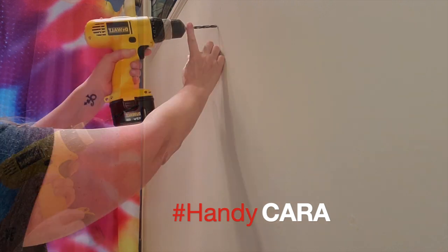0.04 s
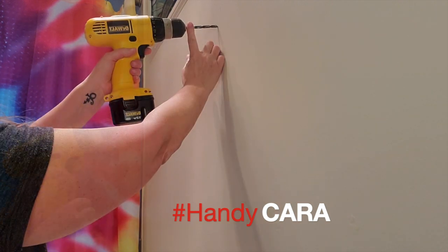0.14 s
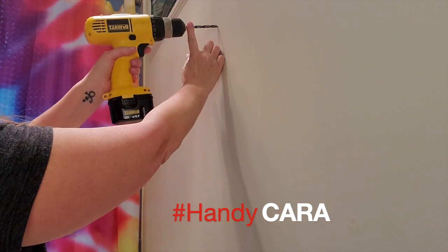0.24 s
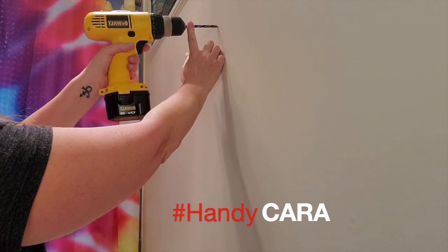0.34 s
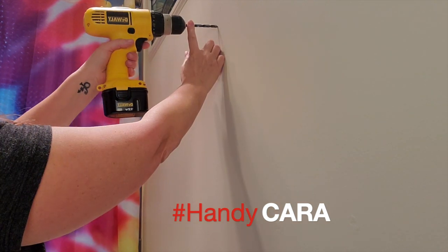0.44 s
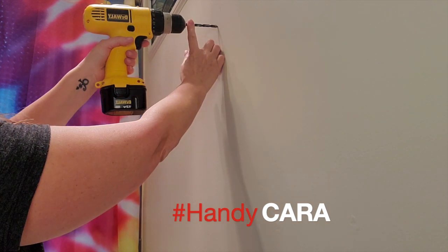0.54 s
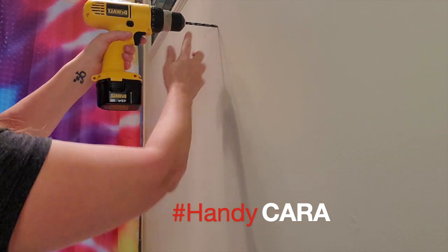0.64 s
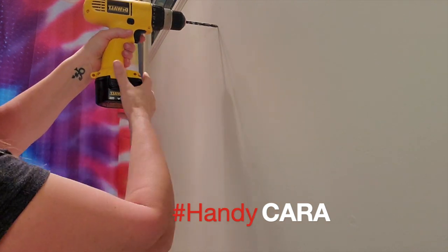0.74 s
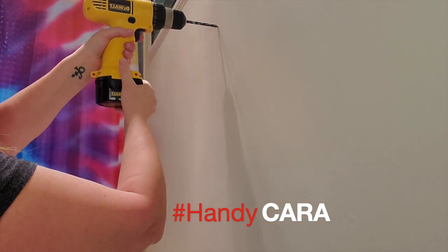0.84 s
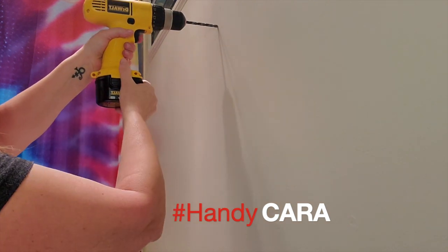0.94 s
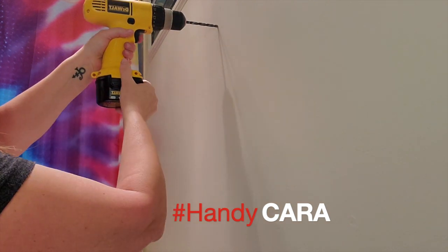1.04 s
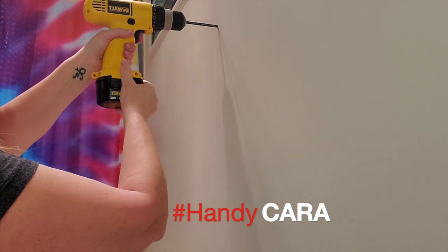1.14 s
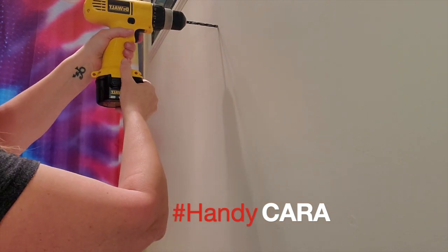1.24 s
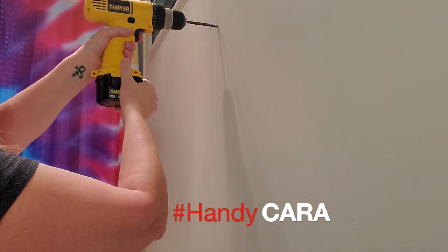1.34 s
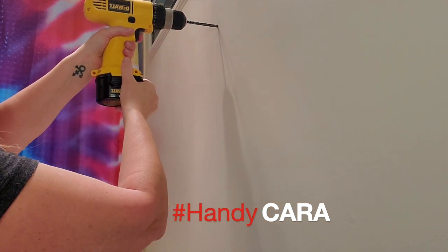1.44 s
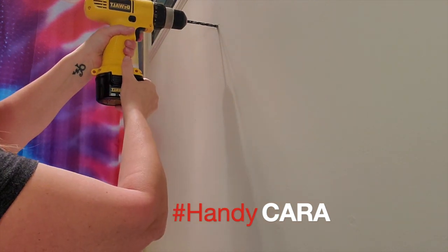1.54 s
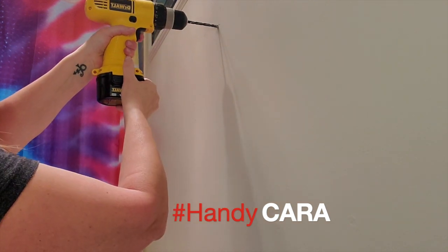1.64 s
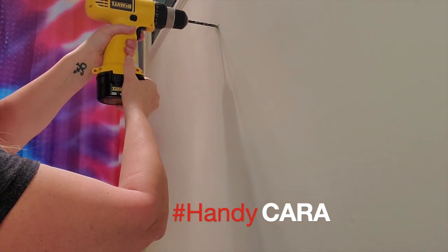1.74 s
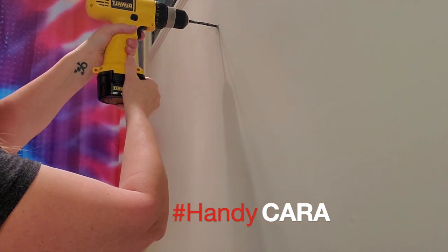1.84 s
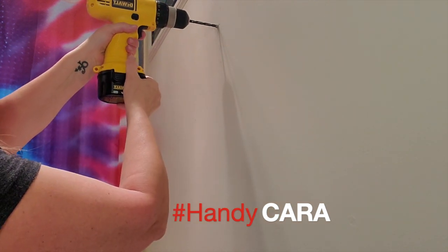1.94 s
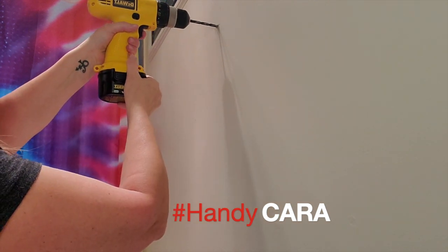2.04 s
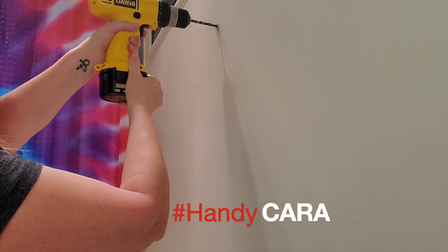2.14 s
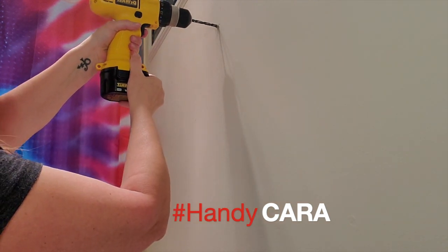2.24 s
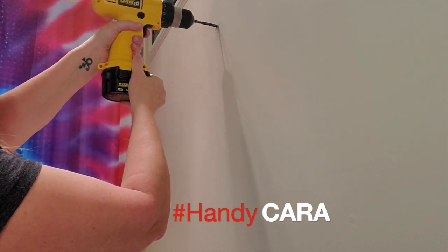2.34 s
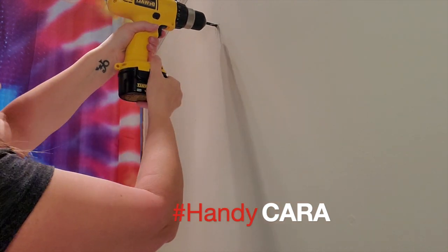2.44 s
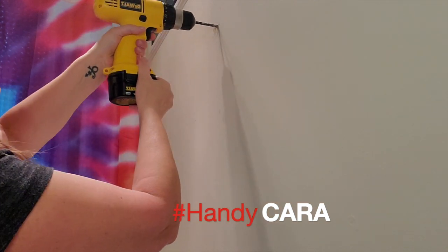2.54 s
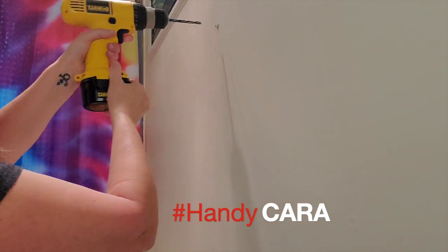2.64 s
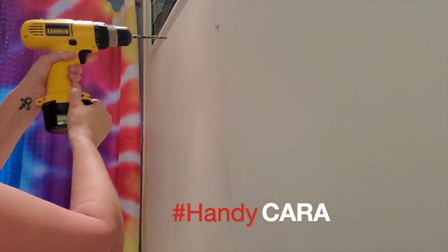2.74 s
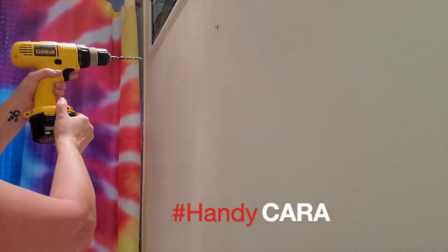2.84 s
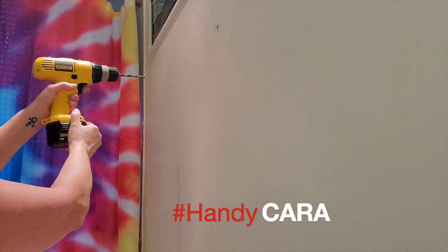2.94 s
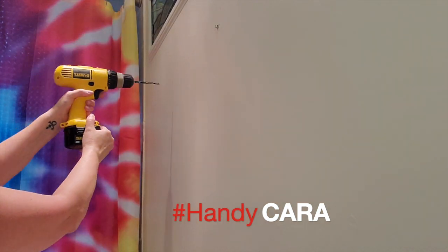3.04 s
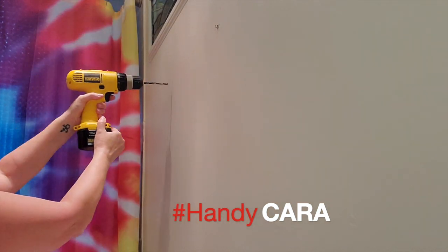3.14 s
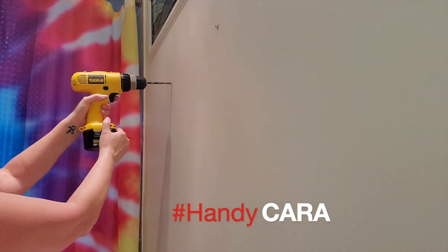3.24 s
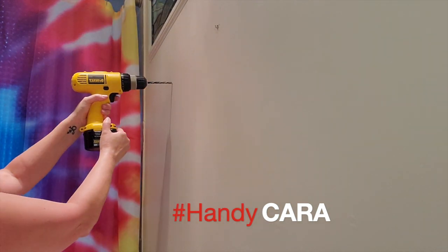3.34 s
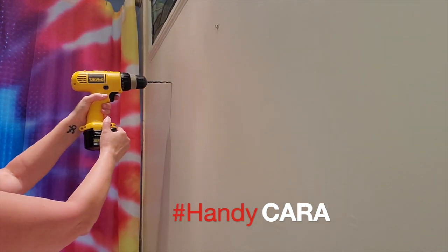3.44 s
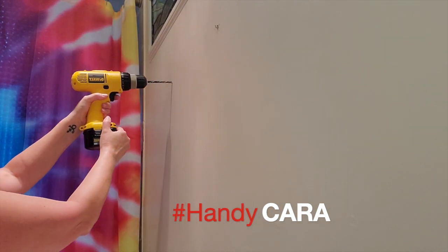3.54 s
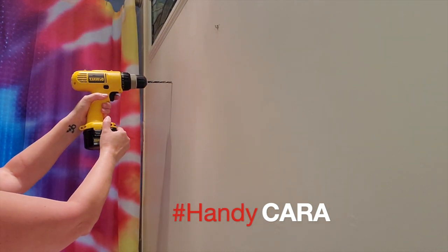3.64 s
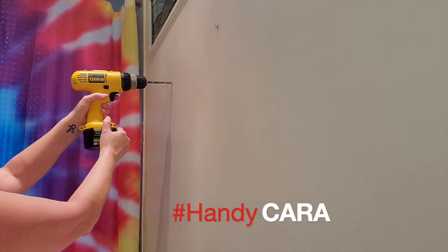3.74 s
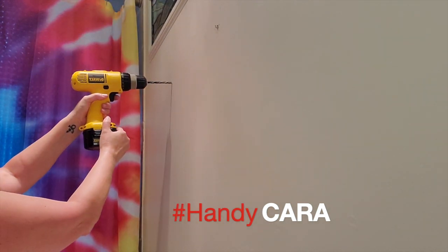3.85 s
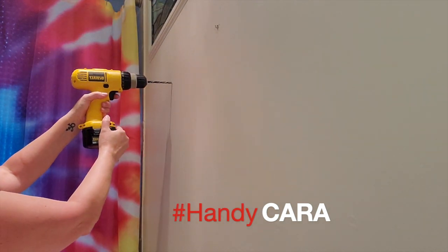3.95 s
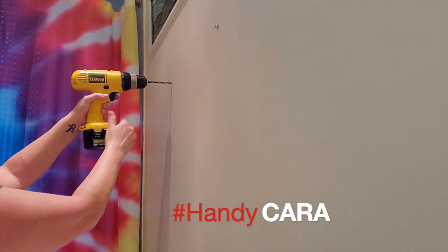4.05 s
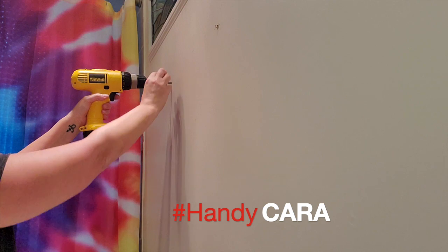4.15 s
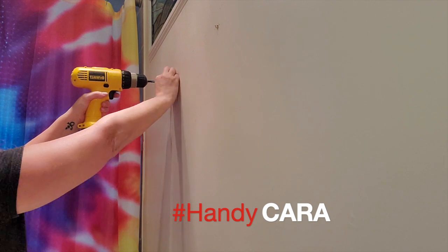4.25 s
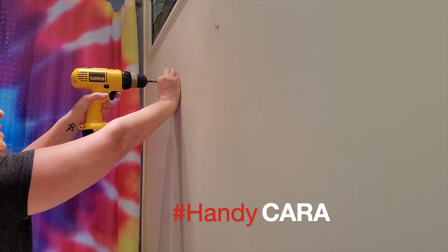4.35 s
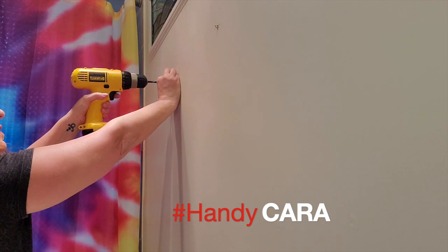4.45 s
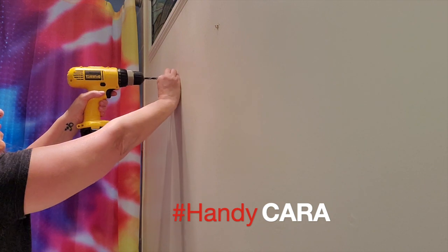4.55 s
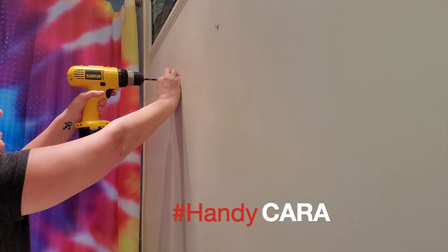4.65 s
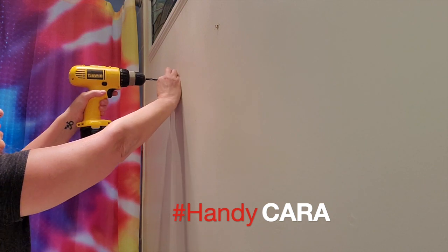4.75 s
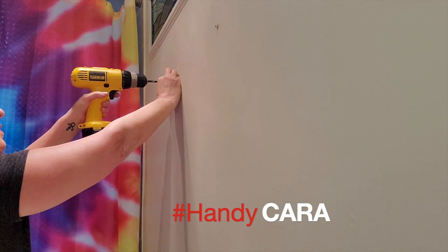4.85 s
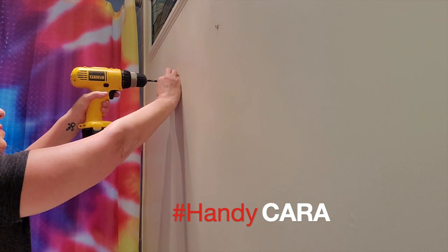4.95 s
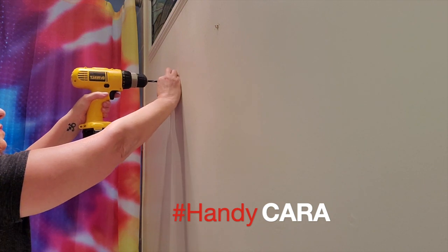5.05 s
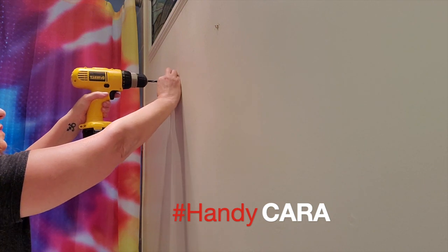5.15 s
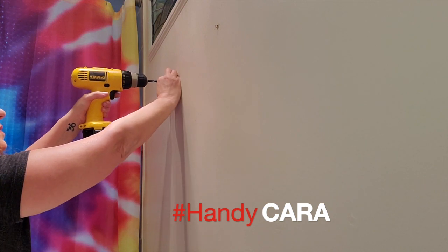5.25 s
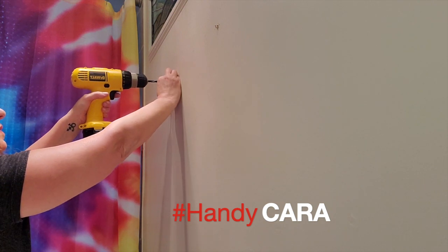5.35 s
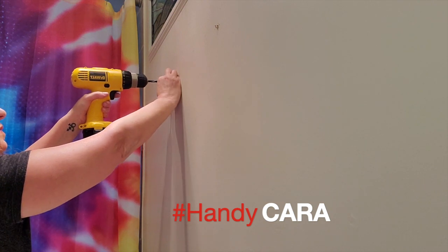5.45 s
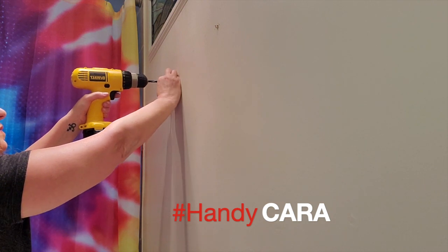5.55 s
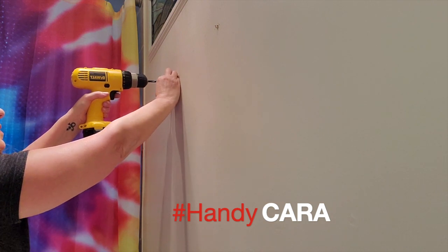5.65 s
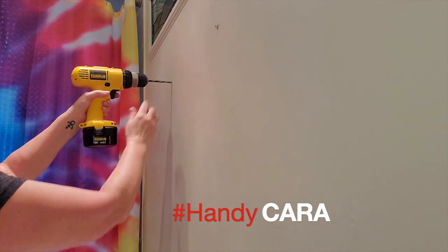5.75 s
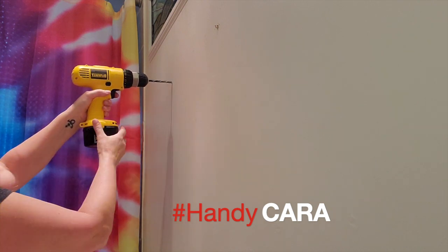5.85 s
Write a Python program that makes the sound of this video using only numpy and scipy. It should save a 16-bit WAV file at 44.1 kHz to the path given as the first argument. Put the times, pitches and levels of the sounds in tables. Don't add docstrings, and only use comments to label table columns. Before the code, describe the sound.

A cordless drill whirs up, bores into a hollow wall, races at breakthrough and stops dead, followed by scattered knocks, clinks and brushing.

```python
import sys
import numpy as np
from scipy import signal
from scipy.fft import rfft, irfft
from scipy.io import wavfile
from scipy.ndimage import uniform_filter1d

SR = 44100
rng = np.random.default_rng(int(sys.argv[2]) if len(sys.argv) > 2 else 0)


def file_out(sig):
    cols = np.atleast_2d(sig).T
    lim = np.clip(cols, -1, 1)
    pcm = np.round(lim * 32767).astype(np.int16)
    wavfile.write(sys.argv[1], SR, pcm)


def field_ratio(decibels):
    return 10 ** (np.asarray(decibels, dtype=float) / 20)


N = 260537
TIME_S = np.arange(N) / SR

# t/s, goal speed/(turns/s), time constant/s
SPEED_STAGES = [
    (.867, 297.5, .184),
    (1.122, 366.5, .09),
    (1.63, 371, .07),
    (2.041, 420.3, .135),
    (2.391, 497, .013),
    (2.428, 66, .586),
    (2.545, 419, .01),
]
START_S, THROUGH_S, BRAKE_S = .84, 2.407, 2.554
IDLE_TURNS_PER_S, CRUISE_TURNS_PER_S = 184, 370
# t/s, half length/s, hiss level/dB, load level/dB, boom level/dB
SHOVES = [(0.94, 0.092, 2, -4, 13), (1.14, 0.038, -2.5, 0, 8.5), (1.19, 0.006, -6, -22, 13),
          (1.239, 0.0047, 3.5, 3, -18), (1.283, 0.015, 0, 1.5, 1), (1.353, 0.022, 0, -3, 17.5),
          (1.405, 0.042, -2, 5.5, 9.5), (1.528, 0.11, 1.5, 0.5, 10), (1.562, 0.024, 0, 9, -5),
          (1.624, 0.076, -0.5, -2, 3), (1.808, 0.11, -0.5, 0, 4), (1.921, 0.021, -2, -2.5, 7.5),
          (2.188, 0.056, 1, 0, -30), (2.288, 0.042, 1, -4, -11.5), (2.354, 0.1, 1, 3.5, 23),
          (2.525, 0.064, 1, 3.5, 16.5)]
HISS_DB, HISS_PER_DECADE_DB, HISS_TOP_DB, HISS_DIES_DB_PER_S = -39.5, 22.5, -39, 984
LOAD_DB, LOAD_PER_DECADE_DB, LOAD_DIES_DB_PER_S = -43, 29, 601
BITE_DB_PER_S, FREE_DB = 5.5, -6.5
BOOM_DB, BOOM_PER_DECADE_DB, BOOM_DIES_DB_PER_S, BOOM_WAVER_DB = -52.5, 25, 500, 5.5
# f/Hz, level/(dB per Hz)
GEAR_HISS = [(820, -58.5), (1400, -37), (1990, -26.5), (2160, -18), (2510, -0.5), (2720, -8.5), (3330, -7),
             (4540, -8), (5300, -12.5), (6080, -13.5), (7200, -10), (9470, -8.5), (12100, -11.5),
             (14300, -10.5), (15500, -16)]
# f/Hz, width/Hz, level over hiss/dB
CASING_MODES = [(2540, 40, -25), (14200, 1600, -18)]
# multiple of motor speed, level over hiss/dB, width/Hz
GEAR_ORDERS = [(2, -28, 8), (3.28, -25, 15), (7, -19, 4), (10, -31, 12), (12, -14, 10), (12.55, -12, 14),
               (24, -11, 50), (25.05, -11, 16), (36.55, -17, 25), (38, -18, 25), (39.1, -18, 25)]
# f/Hz, level/dB
CASING_RADIATION = [(2000, -4), (2400, 9), (2555, 12), (2610, 9.5), (2660, 5), (2750, 8), (3000, 9),
                    (3300, 8), (3500, 12), (3900, 14), (4300, 5), (4450, 4), (4620, 1), (4950, 7),
                    (5180, 3), (5400, 5), (6000, 7), (7000, 5), (8200, 7), (8800, -4), (9150, 5), (9400, 1),
                    (9800, 6), (12000, 7), (13000, 4)]
# f/Hz, level over hiss/dB
SHAFT_HUM = [(180, -36), (205, -14), (225, -5), (250, -5), (280, -8), (350, -14), (375, -16), (392, -8),
             (408, -3), (490, -28)]
# f/Hz, level over hiss/dB
ARMATURE_WHINE = [(1000, -36), (1160, -26), (1230, -10), (1350, -11), (1620, -2), (1700, -3), (1800, -15),
                  (1860, -18), (2030, -12), (2100, -12), (2450, -9)]
# f/Hz, level/(dB per Hz)
GRIND_SPECTRUM = [(150, -23.5), (250, -2.5), (376, 1.5), (480, -11), (674, 7.5), (883, -2), (1190, 2),
                  (1380, 0.5), (2000, -10), (2600, -55), (4400, -120)]
# f/Hz, width/Hz, level over load/dB
PANEL_MODES = [(404.4, 9.9, -24), (688, 9, -10), (622, 220, -34), (1000, 150, -20), (1200, 99, -17.5)]
# t/s, f/Hz, level/dB
BIT_CHATTER = [(1.08, 195, -13), (1.3, 266, -8), (1.45, 289, -4), (1.62, 296, -6), (1.73, 318, 0),
               (2.05, 322, 1.5), (2.2, 344, 0), (2.28, 348, -12), (2.4, 350, -30)]
# multiple of chatter, level over load/dB, width/Hz
FLUTE_ORDERS = [(1, -8, 5), (2, -3, 6), (3, -11, 8)]

# start t/s, end t/s, start f/Hz, end f/Hz, level/dB
SWITCH_STEPS = [(0.774, 0.802, 13370, 13050, -65), (0.805, 0.845, 10930, 10800, -65.5),
                (0.832, 0.889, 9100, 10060, -51.5), (0.882, 0.979, 10200, 10500, -56),
                (0.96, 1.25, 10380, 11630, -62.5), (5.843, 5.872, 12200, 13000, -69),
                (5.864, 5.874, 12100, 11800, -60), (5.886, 5.896, 10900, 9900, -62),
                (5.894, 5.916, 8800, 9590, -54), (5.883, 5.917, 4270, 4480, -71)]
# t/s, peak level/dB, bass level/dB, upper level/dB
KNOCKS = [(0.068, -53.5, 14.5, -1), (0.777, -62.5, -5, 1.5), (2.779, -64, 4, 1.5), (2.904, -64, 11.5, -25),
          (3.247, -40.5, -6, -5.5), (3.341, -47, -19.5, -6.5), (3.507, -42, -2, -6), (3.725, -56, -41, -20),
          (4.054, -57, -8, -11), (4.195, -54, -20, -2), (4.358, -53, 3, -9.5), (4.412, -61, -22, -4),
          (4.481, -61, -6, -12), (4.632, -53, -15, -3), (4.83, -37, -11.5, -4), (4.991, -45.5, -3, -11),
          (5.633, -57, -13, -7)]
# f/Hz, level/dB, t60/s
WALL_MODES = [(139, -1, 0.19), (183.3, -7, 0.23), (214, 17.5, 0.061), (322.4, -0.5, 0.19), (405.8, 1, 0.22),
              (578.6, 7.5, 0.097), (625, 13.5, 0.073), (802, 1, 0.071), (950, 5, 0.052),
              (1042, 26.5, 0.014), (1194, 10, 0.027), (1570, -1, 0.041)]
# f/Hz, level/(dB per Hz)
THUD_SPECTRUM = [(60, -17), (200, 7), (600, -4), (1200, -22), (2200, -37), (4000, -50), (12000, -90)]
# t/s, peak level/dB, f/Hz, t60/s
CLINKS = [(2.663, -62, 717, 0.065), (2.777, -56, 660, 0.054), (2.829, -57, 549, 0.086),
          (2.979, -45, 3850, 0.035), (4.003, -70, 1870, .03), (4.02, -55, 3730, 0.04),
          (4.112, -58.5, 3380, .04), (4.135, -64, 3330, .06), (4.153, -66, 3340, .05),
          (4.182, -65, 3370, .04), (4.189, -54.5, 1014, 0.062), (4.22, -65, 2620, .04),
          (4.295, -61, 974, 0.048), (4.302, -58, 410, 0.071), (4.31, -66, 1350, 0.035),
          (4.358, -62, 1640, .03), (4.417, -65, 590, 0.067), (4.441, -62, 1050, 0.079),
          (4.481, -58.5, 1690, 0.057), (4.517, -60, 1054, 0.054), (4.524, -55, 464, 0.058),
          (5.845, -66, 2180, 0.022)]
CLINK_PARTIALS = [(.84, .35), (.93, .55), (.975, .6), (1, .7), (1.045, .55), (1.13, .45), (1.24, .3)]
# t/s, peak level/dB, f/Hz, t60/s
TICKS = [(0.5916, -72, 3950, 0.033), (0.7072, -56.5, 6170, 0.015), (0.7701, -54, 3760, 0.014),
         (0.776, -66, 3530, 0.021), (2.9784, -54.5, 3900, 0.033), (3.2405, -64, 2200, 0.027),
         (4.001, -58.5, 4700, 0.017), (4.0202, -60.5, 5730, 0.022), (4.1788, -69, 3470, 0.032),
         (4.2997, -69.5, 4070, 0.019), (4.353, -71, 3240, 0.025), (4.4805, -75, 3800, 0.028),
         (4.5194, -83, 2530, 0.03), (4.6264, -66, 2830, 0.02), (5.5993, -70, 2240, 0.029),
         (5.623, -69, 2240, 0.024), (5.631, -62, 2160, 0.023), (5.8446, -73, 2180, 0.021)]
# peak t/s, peak level/dB, rise/s, fall/s
SKIN_STROKES = [(.772, -49, 0.0098, 0.0097), (.86, -51, 0.038, .008), (2.62, -77, .01, .035),
                (2.68, -71.5, 0.033, 0.38), (2.972, -64, 0.062, 0.038), (4.008, -72, 0.041, 0.037),
                (4.05, -79, .05, 0.18), (4.116, -77, 0.049, 0.3), (4.482, -86, 0.025, 0.044),
                (4.624, -79, .035, .05), (5.638, -93, .045, .017), (5.843, -64, .002, 0.011),
                (5.91, -54, 0.031, .01)]
# f/Hz, level/(dB per Hz)
SKIN_SPECTRUM = [(700, -15), (1200, -3), (2500, -3.5), (3600, 2), (6000, -3), (10000, -9), (15500, -23)]
# peak t/s, peak level/dB, rise/s, fall/s
DUST_SLIDES = [
    (3.056, -53, 0.063, 0.38),
    (4.006, -55, 0.0067, 0.032),
    (4.18, -70.5, .05, .25),
]
# f/Hz, level/(dB per Hz)
DUST_SPECTRUM = [(530, -22), (900, -27), (1100, -28), (1200, -20), (2220, -12.5), (2620, -17), (3970, -6.5),
                 (4270, -9), (15400, -7)]
# peak t/s, peak level/dB, rise/s, fall/s
RUSTLES = [(.626, -71, 0.35, 0.035), (.776, -61.5, 0.15, 0.094), (.858, -61, 0.048, .004),
           (2.6, -64.5, 0.0065, 0.19), (2.782, -65.5, 0.0079, 0.25), (2.91, -76.5, .03, 0.66),
           (3.08, -76, .03, 0.31), (4.0, -64.5, 0.0034, 0.23), (4.2, -79, 0.057, 0.36),
           (4.37, -78, 0.34, 0.12), (4.53, -68.5, 0.13, 0.02), (4.638, -59, .02, .04),
           (5.638, -50, 0.031, 0.029), (5.91, -61.5, 0.28, .01)]
# f/Hz, level/(dB per Hz)
RUSTLE_SPECTRUM = [(150, -0.5), (250, 1), (400, 4), (600, -9.5), (1000, -1.5), (1700, -11), (2500, -19.5)]

# f/Hz, t60/s
ROOM_T60 = [(150, 0.138), (600, 0.12), (3000, 0.1), (12000, 0.055)]
# f/Hz, likeness
NEAR_LIKENESS = [(100, 0.98), (300, 1), (600, 0.89), (1200, 0.87), (2500, 0.63), (5000, 0.17),
                 (12000, 0.081)]
# f/Hz, left over right level/dB
PORT_LEAN = [(60, -6.5), (130, 0), (290, -3), (640, 1), (1410, 0), (3100, 1.5), (6820, -0.5), (15000, 6.5)]
# t/s, half length/s, deep level/dB, low level/dB
JOLTS = [(0.098, 0.021, -55, -81), (0.416, 0.08, -66, -80), (0.592, 0.025, -76, -56),
         (0.797, 0.11, -59, -80), (1.395, 0.037, -77, -55), (1.663, 0.11, -72, -57.5),
         (2.2, 0.043, -67, -80), (2.378, 0.068, -41, -50), (2.575, 0.061, -42.5, -48),
         (2.68, 0.068, -65, -83), (2.948, 0.076, -57, -78), (3.13, 0.15, -60.5, -80),
         (3.275, 0.027, -73, -45), (3.4, 0.12, -64, -58), (3.54, 0.048, -50, -51),
         (4.082, 0.12, -56.5, -66), (4.384, 0.056, -62, -57), (4.487, 0.06, -69, -61),
         (4.7, 0.065, -91, -55.5), (4.87, 0.047, -55, -42.5), (5.014, 0.047, -65, -49)]
DEEP_DB, LOW_DB, LUMPY_DB, SETTLE_S, SETTLED_DB = -73, -61.5, 0.5, 5.08, -2.5
# f/Hz, level/(dB per Hz)
FLOOR_SPECTRUM = [(88, -32), (150, -5.5), (172, -20.5), (245, -11), (270, -14.5), (537, -24.5),
                  (641, -20.5), (827, -23.5), (913, -20.5), (1230, -25.5), (3540, -26.5), (10400, -38.5),
                  (16400, -47)]
# f/Hz, likeness
FLOOR_LIKENESS = [(60, -0.097), (180, 0.22), (550, 0.41), (1650, -0.019), (4970, -0.59), (15000, -0.36)]
FLOOR_DB = -69.5


def drill():
    t = np.arange(START_S, BRAKE_S + .065, 1 / SR)
    speed = motor_speed(t)
    hiss_db, load_db, boom_db = effort(t, speed)
    wander = 0.0014 + .007 * (t > THROUGH_S)
    speed = uniform_filter1d(speed, 600) * (1 + wander * drift(len(t), 60))
    tool = field_ratio(hiss_db + 2.5) * gears(t, speed)
    tool += field_ratio(load_db - 2.5) * grinding(t)
    tool += field_ratio(boom_db) * panel_boom(t)
    out = np.zeros(N)
    add(out, t[0], tool * signal.windows.tukey(len(t), .015))
    return out


def motor_speed(t):
    speed = np.full(len(t), float(IDLE_TURNS_PER_S))
    for s, goal, lag_s in SPEED_STAGES:
        excess = np.interp(s, t, speed) - goal
        closing = goal + excess * np.exp(-np.maximum(t - s, 0) / lag_s)
        speed = np.where(t < s, speed, closing)
    return speed


def effort(t, speed):
    pace = np.log10(speed / CRUISE_TURNS_PER_S)
    slow = np.minimum(pace, 0)
    braked_s = np.maximum(t - BRAKE_S, 0)
    hiss_db, load_db, boom_db = sum(np.outer(db, hump(t, s, half_s)) for s, half_s, *db in SHOVES)
    hiss_db = hiss_db + np.minimum(HISS_DB + HISS_PER_DECADE_DB * pace, HISS_TOP_DB)
    hiss_db = hiss_db - HISS_DIES_DB_PER_S * braked_s
    free = .5 + .5 * np.tanh((t - THROUGH_S) / 0.019)
    load_db = load_db + LOAD_DB + LOAD_PER_DECADE_DB * slow
    load_db = load_db + BITE_DB_PER_S * (t - 1.7) + FREE_DB * free
    load_db = load_db - LOAD_DIES_DB_PER_S * np.maximum(braked_s - .022, 0)
    boom_db = boom_db + BOOM_DB + BOOM_PER_DECADE_DB * slow + BOOM_WAVER_DB * drift(len(t), 23)
    boom_db = boom_db - BOOM_DIES_DB_PER_S * np.maximum(braked_s - .03, 0)
    return hiss_db, load_db, boom_db


def gears(t, speed):
    turns = np.cumsum(speed) / SR
    throb = 1 + 0.13 * np.cos(2 * np.pi * .57 * turns)
    air = rng.standard_normal(len(t)) * throb * field_ratio(.9 * drift(len(t), 25))
    out = streaked(coloured(air, GEAR_HISS[:-1]), speed)
    for hz, width_hz, db in CASING_MODES:
        out += field_ratio(db + drift(len(t), 7)) * evened(resonate(air, hz, width_hz))
    pace_db = np.minimum(1.6 * np.log10(speed / 380), 0)
    for k, db, width_hz in GEAR_ORDERS:
        hz = k * speed
        level_db = db + read(CASING_RADIATION, hz) + k * k / 12 * pace_db
        if k == 7:
            level_db = level_db - np.clip(hz / 15 - 175, 0, 9)
        out += field_ratio(level_db) * order(hz, width_hz, steady=.75, waver_db=1.5)
    hum_db = read(SHAFT_HUM, speed) - 9 * (t > THROUGH_S)
    out += field_ratio(hum_db) * order(speed, 6, steady=.88, waver_db=1.4)
    whine_hz = 5 * speed
    out += field_ratio(read(ARMATURE_WHINE, whine_hz)) * order(whine_hz, 7, steady=.88, waver_db=1.4)
    return out


def streaked(x, speed, streak_db=3.0, valley_db=-12):
    hz, t, z = signal.stft(x, SR, nperseg=1024)
    streaks = uniform_filter1d(rng.standard_normal(z.shape), size=8, axis=1)
    streaks = evened(uniform_filter1d(streaks, 2, 0))
    slow = 1 - np.interp(t, np.arange(len(x)) / SR, speed) / 420
    valley = np.exp(-(np.log(hz / 6500 + 1e-9) / 1.2) ** 2)[:, None] * slow * valley_db
    return evened(signal.istft(z * field_ratio(streak_db * streaks + valley), SR, nperseg=1024)[1][:len(x)])


def grinding(t):
    grit = rng.standard_normal(len(t)) * field_ratio(0.44 * drift(len(t), 25))
    out = evened(coloured(grit, GRIND_SPECTRUM))
    for hz, width_hz, db in PANEL_MODES:
        out += field_ratio(db) * evened(resonate(grit, hz, width_hz))
    at_s, hz, db = np.transpose(BIT_CHATTER)
    chatter_hz, chatter_db = np.interp(t, at_s, hz), np.interp(t, at_s, db)
    for k, db, width_hz in FLUTE_ORDERS:
        out += field_ratio(db + chatter_db) * order(k * chatter_hz, width_hz, steady=0.8)
    return out


def panel_boom(t):
    thrust = rng.standard_normal(len(t))
    upper = 0.054 + .5 * (t > THROUGH_S)
    return evened(resonate(thrust, 210, 38.7)) + upper * evened(resonate(thrust, 476, 344))


def switch():
    out = np.zeros(N)
    for start_s, end_s, from_hz, to_hz, db in SWITCH_STEPS:
        hz = np.linspace(from_hz, to_hz, int((end_s - start_s) * SR))
        fuzz = evened(resonate(rng.standard_normal(len(hz)), hz, 240))
        tone = np.sqrt(2) * np.sin(2 * np.pi * np.cumsum(hz) / SR) + 2.34 * fuzz
        add(out, start_s, field_ratio(db) * tone * signal.windows.tukey(len(hz), .3))
    return out


def knocks():
    out, t = np.zeros(N), TIME_S[:SR // 3]
    swell = 1 - np.exp(-(t / .0105) ** 2)
    for s, peak_db, bass_db, upper_db in KNOCKS:
        tilt = [(200, bass_db), (400, 0.019), (600, upper_db)]
        ring = np.zeros(len(t))
        for hz, mode_db, t60_s in WALL_MODES:
            detune, phase = 1 + 0.027 * rng.standard_normal(), 2 * np.pi * rng.random()
            spot_db = 1.8 * rng.standard_normal()
            level_db = mode_db + spot_db + read(tilt, hz) - 60 * t / t60_s
            ring += field_ratio(level_db) * np.sin(2 * np.pi * hz * detune * t + phase)
        thud = coloured(coloured(rng.standard_normal(len(t)), THUD_SPECTRUM), tilt)
        thud = evened(thud) * field_ratio(7.0 - 60 * t / 0.096)
        add(out, s - .005, field_ratio(peak_db) * (ring + thud) * swell)
    return out


def clinks():
    out, t = np.zeros(N), TIME_S[:4000]
    for s, db, hz, t60_s in CLINKS:
        ring = sum(g * np.sin(2 * np.pi * k * hz * t + 40 * k) for k, g in CLINK_PARTIALS)
        decay = field_ratio(db - 60 * t / max(t60_s, .01))
        add(out, s - .001, decay * ring * np.minimum(t / 0.0028, 1))
    return out


def ticks():
    out, t = np.zeros(N), TIME_S[:4000]
    for s, db, hz, t60_s in TICKS:
        noise = rng.standard_normal(4000)
        snap = evened(coloured(noise, SKIN_SPECTRUM)) + .5 * evened(resonate(noise, hz, 1200))
        decay = field_ratio(db + 8 - 60 * t / max(t60_s, .01))
        add(out, s - .001, decay * snap * np.minimum(t / .0004, 1))
    return out


def brushes():
    skin = rubbing(SKIN_STROKES, SKIN_SPECTRUM, grain_db=4.0, grains_per_s=1200)
    dust = rubbing(DUST_SLIDES, DUST_SPECTRUM[:-1], grain_db=-5.0, grains_per_s=170)
    dust *= field_ratio(-900 * np.maximum(TIME_S - 3.1, 0) * (TIME_S < 3.9))
    return skin + dust + rubbing(RUSTLES, RUSTLE_SPECTRUM, grain_db=5.5, grains_per_s=60)


def rubbing(strokes, colour, grain_db, grains_per_s):
    level = np.zeros(N)
    for s, db, rise_s, fall_s in strokes:
        before, after = (s - TIME_S) / max(rise_s, .002), (TIME_S - s) / max(fall_s, .002)
        level += field_ratio(db - 20 * np.maximum(before, after))
    grains = rng.standard_normal(N) * field_ratio(grain_db * drift(N, grains_per_s))
    return level * evened(coloured(grains, colour))


def room(x):
    taps = np.zeros((2, SR // 2))
    at = np.arange(200, SR // 2 - 20, 20) + rng.integers(0, 20, (2, (SR // 2 - 201) // 20))
    np.put_along_axis(taps, at, rng.choice([-1., 1.], at.shape), 1)
    hz, t, z = signal.stft(taps, SR, nperseg=256)
    decay = field_ratio(-60 * t / read(ROOM_T60, hz)[:, None])
    tail = signal.istft(z * decay, SR, nperseg=256)[1]
    return signal.fftconvolve(x[None], tail / np.linalg.norm(tail[0]), axes=1)[:, :N]


def ports(direct, loose, likeness, lag_s):
    hz = np.fft.rfftfreq(N, 1 / SR)
    share = np.clip(read(likeness, hz), 0, 1)
    turn = np.exp(1j * np.pi * hz * lag_s * np.array([[-1], [1]]))
    return irfft(np.sqrt(share) * rfft(direct) * turn + np.sqrt(1 - share) * rfft(loose), N)


def rumble():
    a, b, c = coloured(rng.standard_normal((3, N)), [(14, -46.0), (34, -16.0)])
    deep = evened(resonate(a, 45.0, 40))
    side = 0.114 * evened(resonate(c, 90, 65)) * np.array([[1], [-1]])
    low = evened(resonate(b, 117.6, 79)) + side
    deep_jolt, low_jolt = sum(np.outer(field_ratio([deep_db, low_db]), hump(TIME_S, s, half_s))
                              for s, half_s, deep_db, low_db in JOLTS)
    settled = .5 + .5 * np.tanh((TIME_S - SETTLE_S) / 0.031)
    quiet = field_ratio(LUMPY_DB * drift(N, 7.5) + SETTLED_DB * settled)
    return deep * (deep_jolt + field_ratio(DEEP_DB) * quiet) + low * np.hypot(low_jolt, field_ratio(LOW_DB) * quiet)


def background():
    air = coloured(rng.standard_normal((3, N)), FLOOR_SPECTRUM)
    return field_ratio(FLOOR_DB) * evened(ports(air[0], air[1:], FLOOR_LIKENESS, lag_s=0))


def evened(x):
    return x / np.sqrt(np.mean(x ** 2) + 1e-20)


def read(points, hz):
    f, value = np.transpose(points)
    return np.interp(np.log(hz + 1), np.log(f + 1), value)


def add(mix, s, sound):
    part = mix[round(s * SR):][:len(sound)]
    part += sound[:len(part)]


def coloured(x, points):
    gain = field_ratio(read(points, np.fft.rfftfreq(x.shape[-1], 1 / SR)))
    return irfft(rfft(x) * gain, x.shape[-1])


def resonate(x, hz, width_hz):
    turn = np.exp(2j * np.pi * np.cumsum(hz * np.ones(len(x))) / SR)
    r = np.exp(-np.pi * width_hz / SR)
    return 2 * (turn * signal.lfilter([(1 - r) ** 2], [1, -2 * r, r * r], x / turn)).real


def drift(n, per_s):
    knots = rng.standard_normal(n // 50)[:int(n / SR * per_s) + 3]
    return np.interp(np.linspace(0, len(knots) - 1, n), np.arange(len(knots)), knots)


def order(hz, width_hz, steady=.7, waver_db=3.5):
    line = np.sqrt(2) * np.cos(2 * np.pi * (np.cumsum(hz) / SR + rng.random()))
    fuzz = evened(resonate(rng.standard_normal(len(hz)), hz, width_hz))
    return field_ratio(waver_db * drift(len(hz), 15)) * (steady * line + (1 - steady) * fuzz)


def hump(t, s, half_s):
    return np.exp(-2 * ((t - s) / half_s) ** 2)


def scene():
    tool = drill()
    crisp = switch() + ticks()
    near = tool + knocks() + .55 * crisp + brushes() + clinks()
    sway = 2 * np.pi * 0.3483 * TIME_S
    echoes = room(near * np.cos(sway)) + room(near * np.sin(sway))
    pair = ports(near, echoes, NEAR_LIKENESS, lag_s=.00005)
    pair = pair + .7 * np.array([np.roll(crisp, 3), crisp])
    lean_db = .5 * read(PORT_LEAN, np.fft.rfftfreq(N, 1 / SR)) * np.array([[1], [-1]])
    return irfft(rfft(pair) * field_ratio(lean_db), N) + background() + rumble()


def low_pass(x):
    return signal.sosfilt(signal.butter(12, 16500, fs=SR, output="sos"), x)


def record(dry):
    edge = signal.firwin(301, 15680, window=("kaiser", 9), fs=SR)
    mix = signal.oaconvolve(dry, edge[None], "same")
    return low_pass(mix)


dry = scene()
out = record(dry)
file_out(out)
```